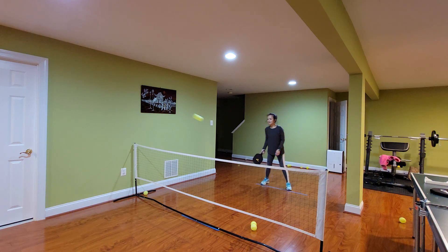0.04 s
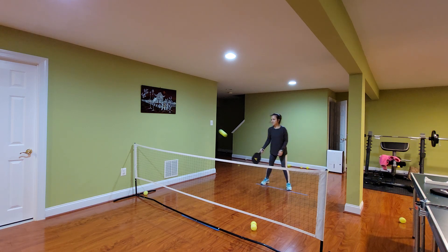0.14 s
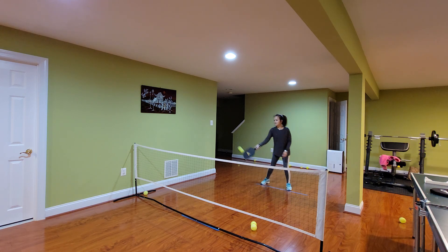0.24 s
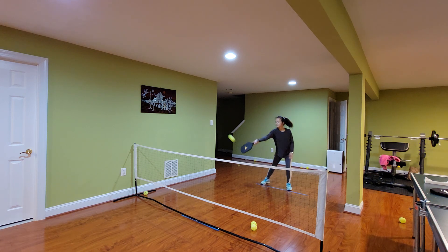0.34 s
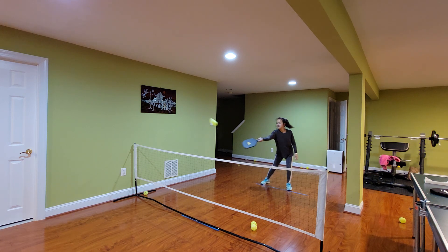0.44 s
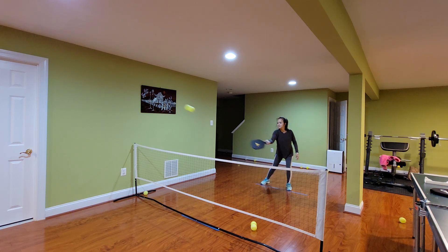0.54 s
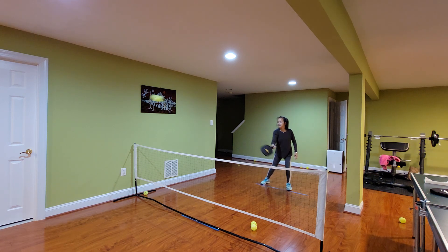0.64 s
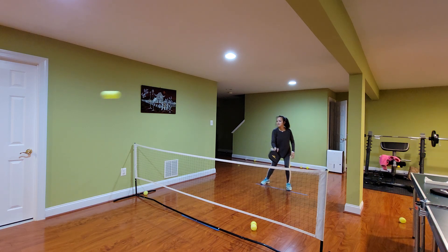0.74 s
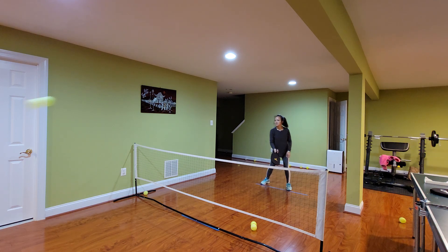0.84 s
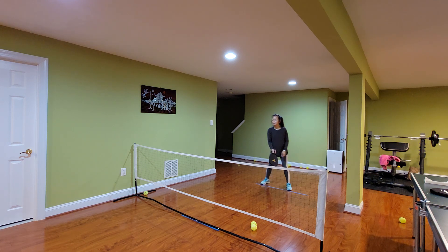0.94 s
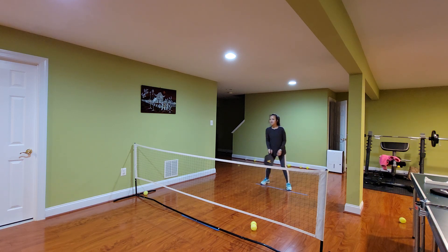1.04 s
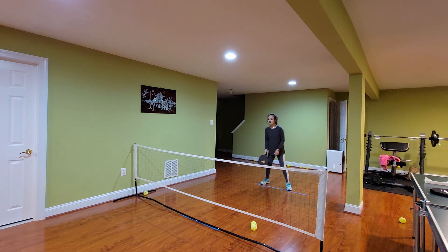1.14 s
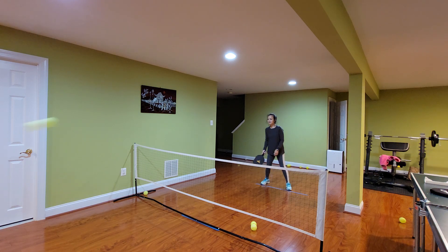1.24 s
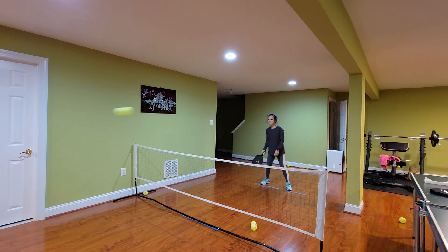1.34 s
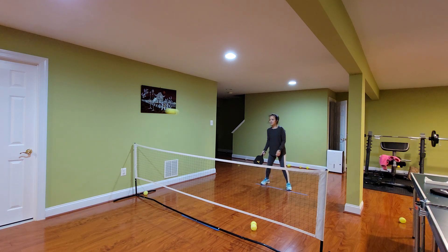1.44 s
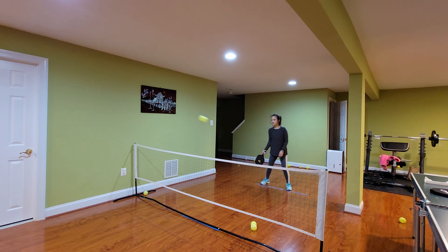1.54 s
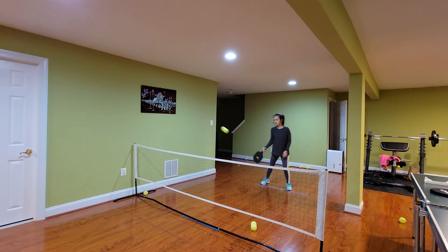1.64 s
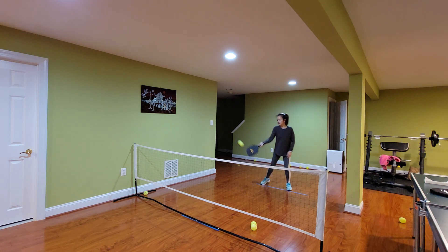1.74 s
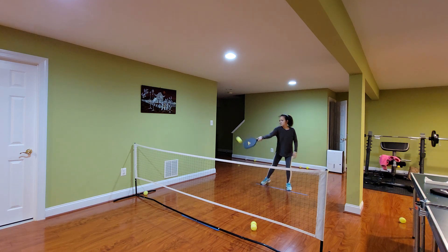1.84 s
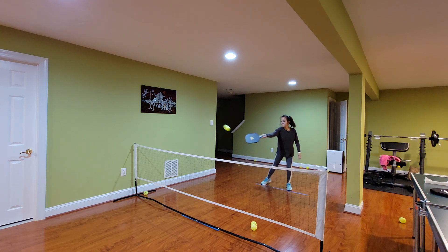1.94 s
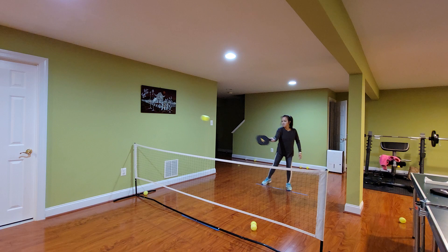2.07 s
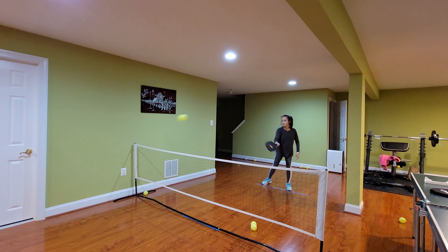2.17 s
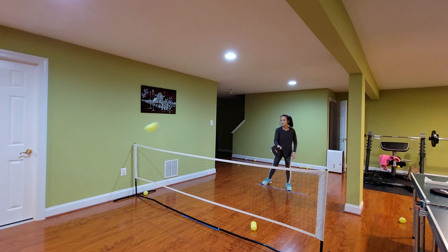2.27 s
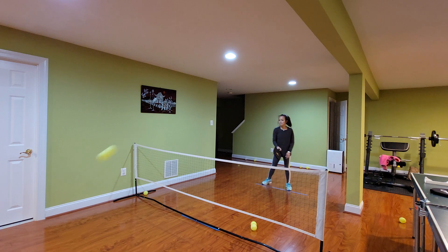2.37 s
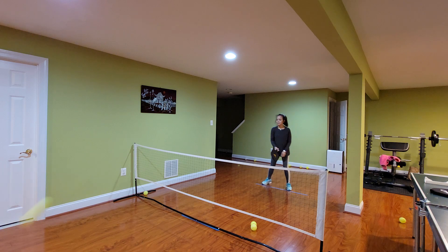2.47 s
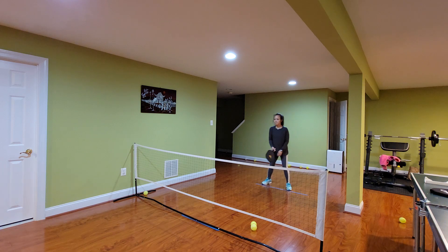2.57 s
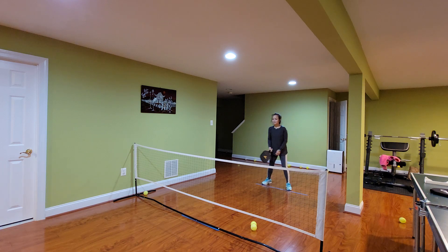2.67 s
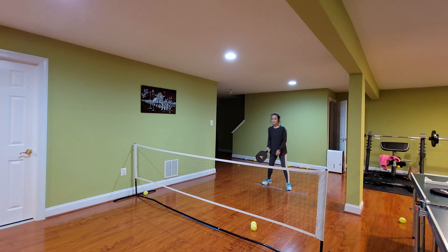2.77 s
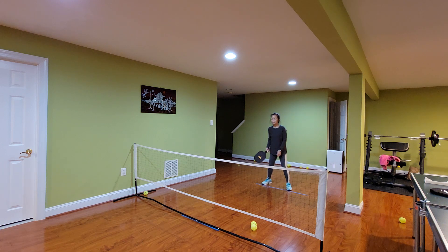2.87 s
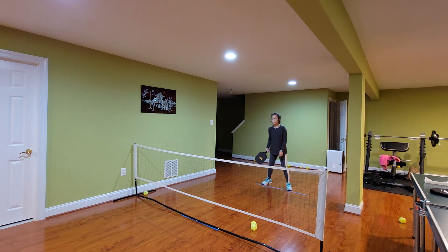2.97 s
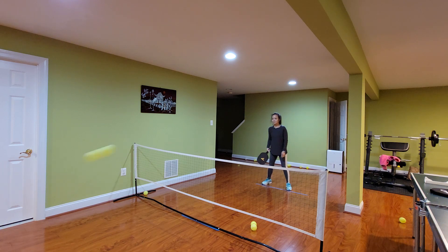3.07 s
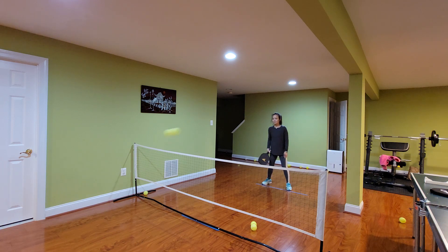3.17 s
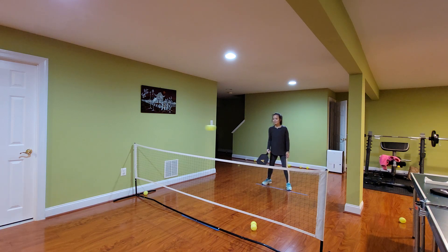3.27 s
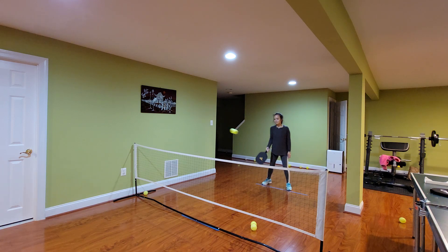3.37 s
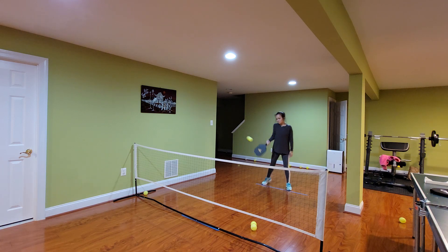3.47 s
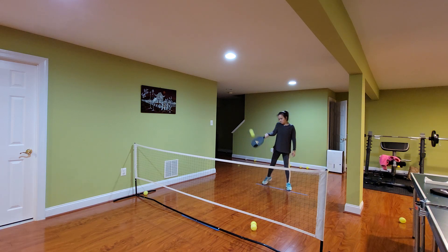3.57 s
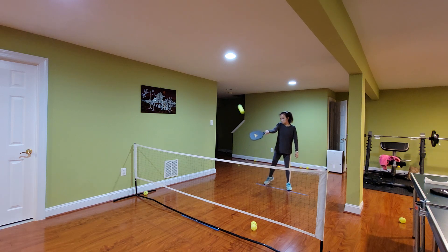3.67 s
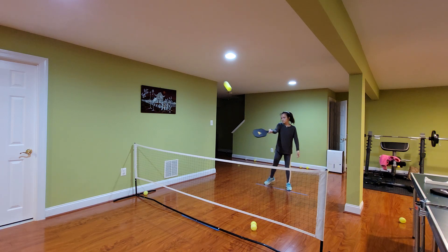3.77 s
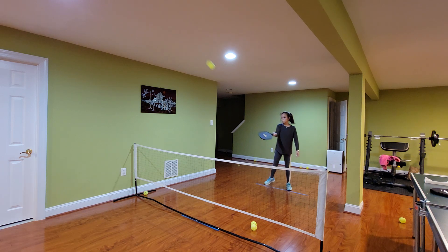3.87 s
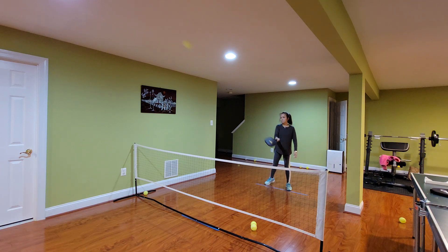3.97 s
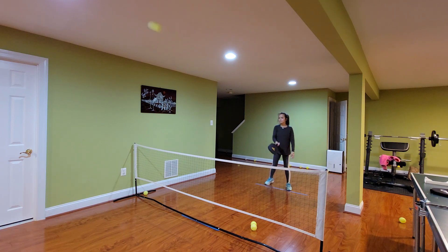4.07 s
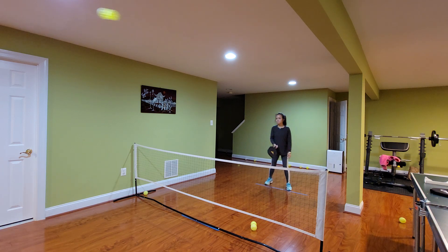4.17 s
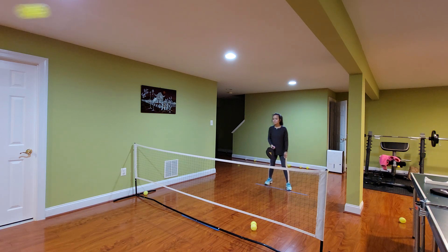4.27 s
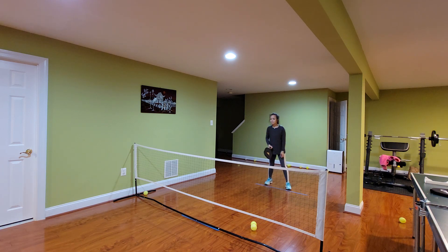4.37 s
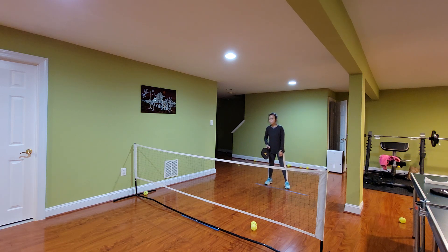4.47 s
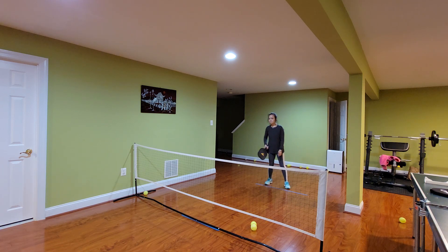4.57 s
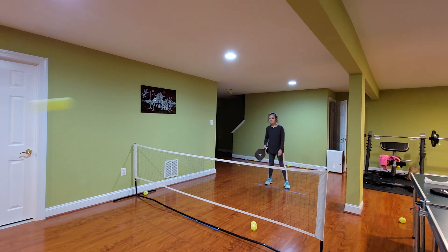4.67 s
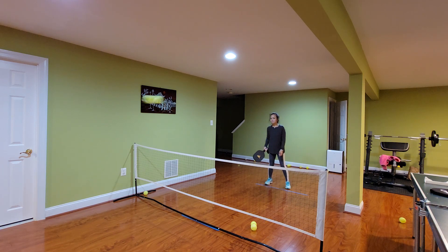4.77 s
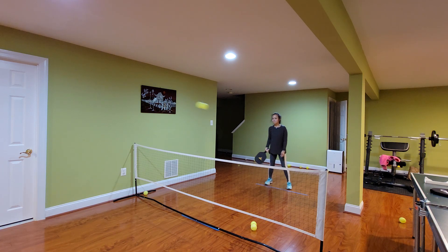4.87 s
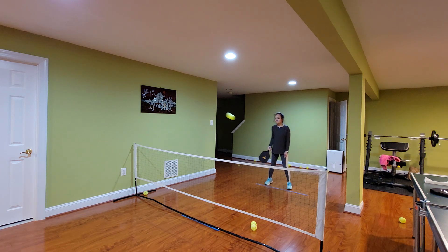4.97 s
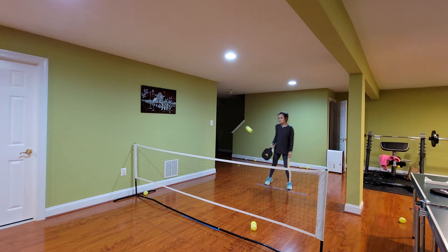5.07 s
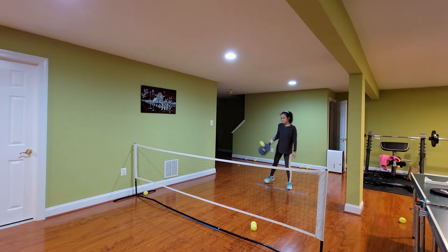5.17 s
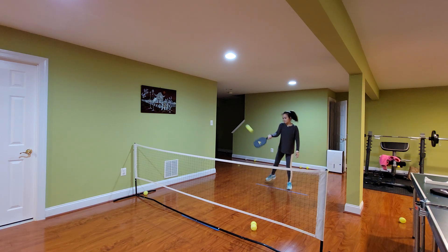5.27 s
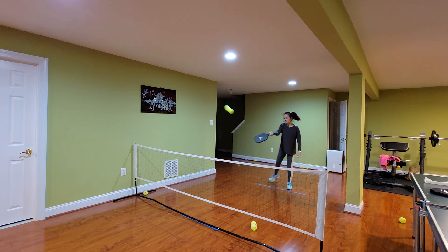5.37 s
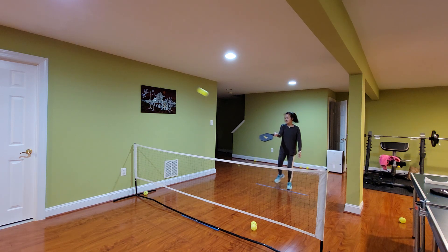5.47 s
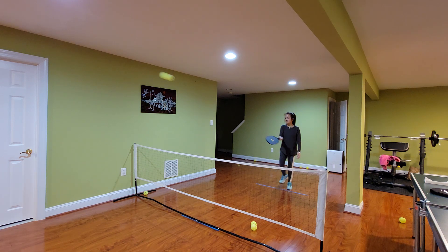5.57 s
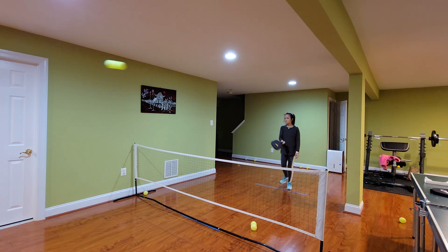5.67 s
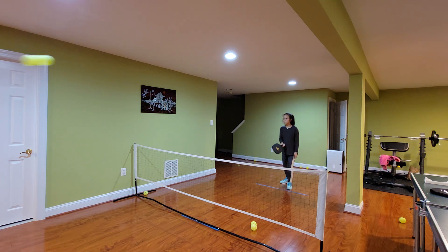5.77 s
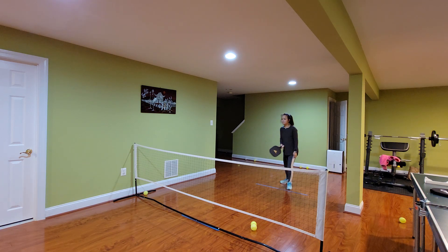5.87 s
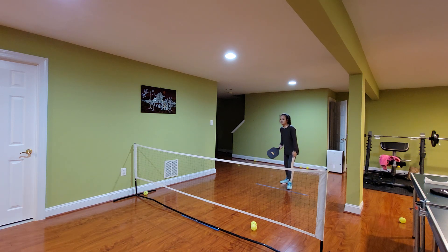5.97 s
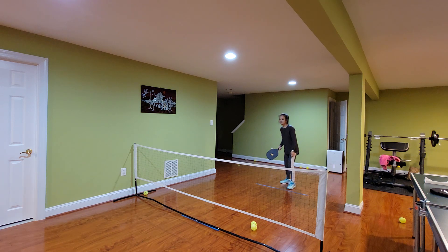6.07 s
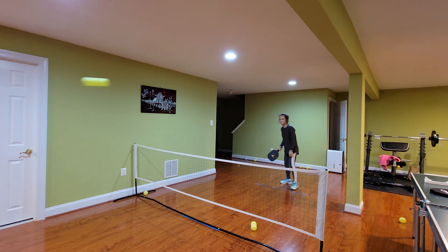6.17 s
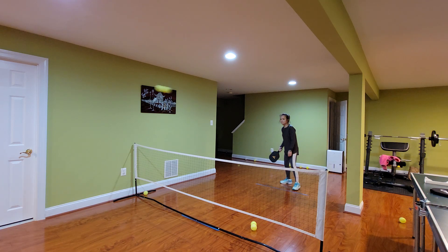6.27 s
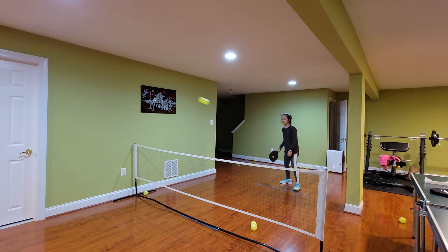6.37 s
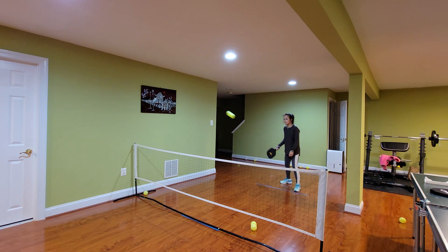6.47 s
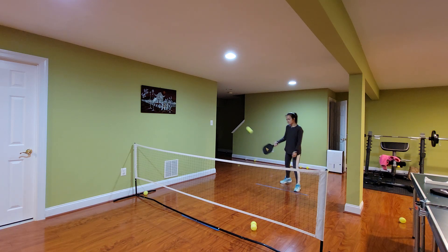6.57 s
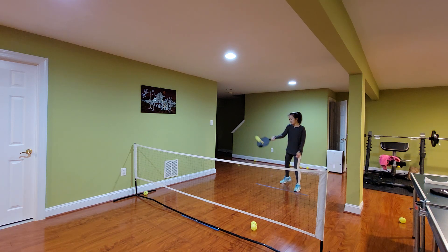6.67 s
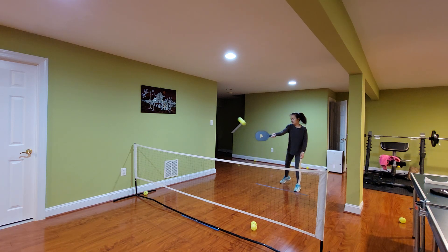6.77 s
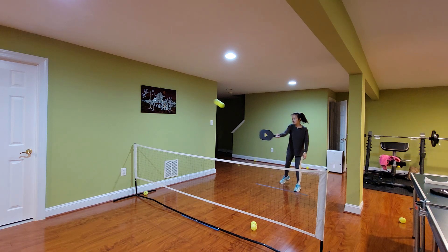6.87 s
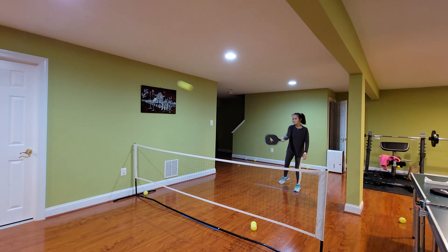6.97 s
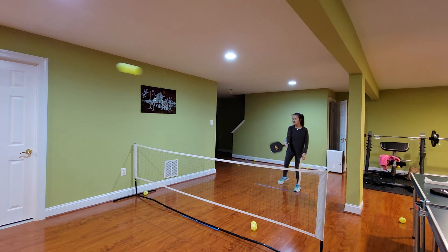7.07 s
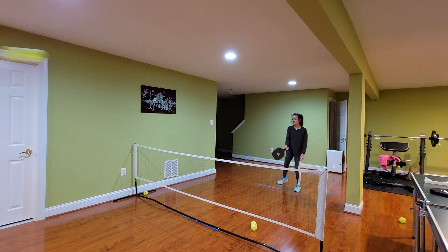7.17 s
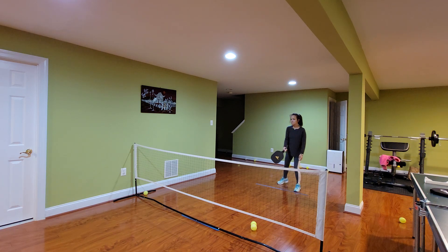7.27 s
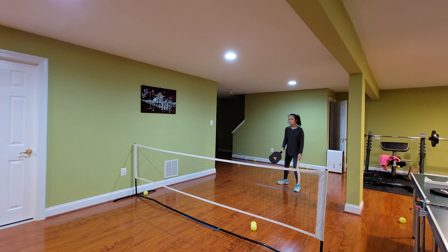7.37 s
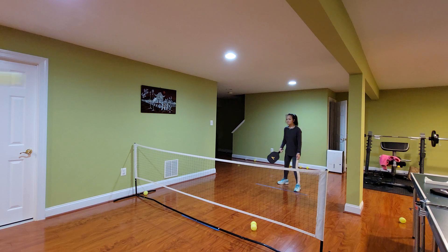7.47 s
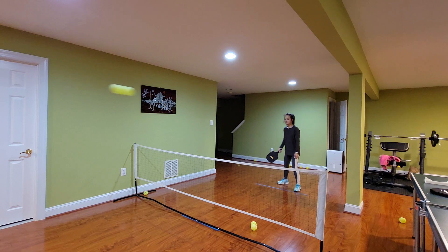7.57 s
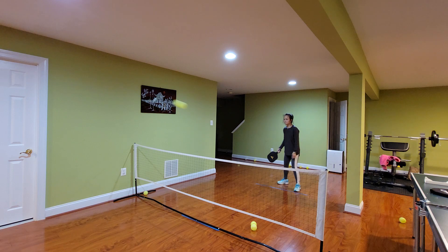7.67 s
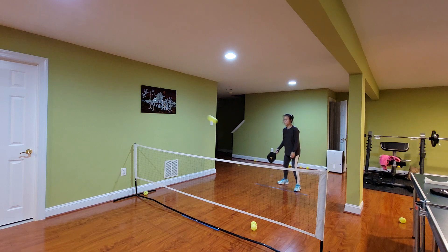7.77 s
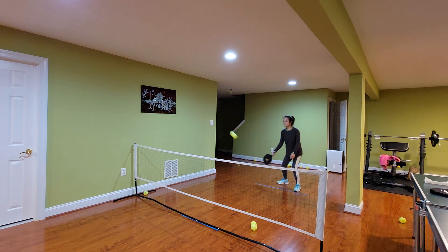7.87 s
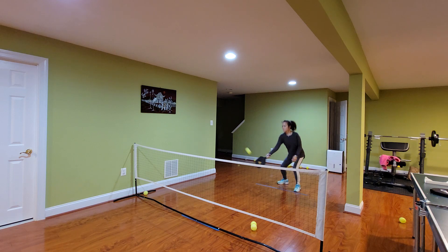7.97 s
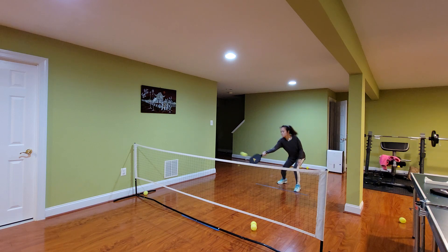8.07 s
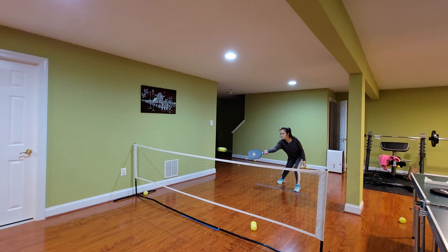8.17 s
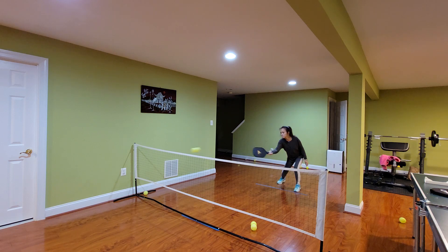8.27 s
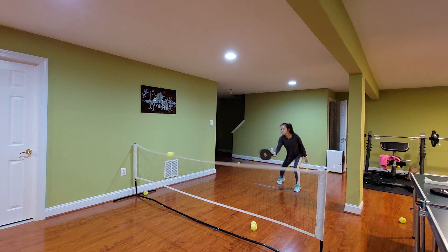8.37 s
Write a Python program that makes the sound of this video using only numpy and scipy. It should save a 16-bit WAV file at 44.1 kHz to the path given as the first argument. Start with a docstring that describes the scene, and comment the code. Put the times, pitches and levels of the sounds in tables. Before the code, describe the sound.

Two players volley a hollow plastic ball in a low, bare basement, heard through a stereo microphone. Each paddle hit is a loud, sharp knock with a bright click, followed by a room ring that fades in under a second. The farther player, ahead, hits first at about 0.4 seconds, the nearer one on the left answers at 1.2, and the far one hits again at 1.9. A soft scuff of shoes and clothes comes around 2.4 seconds, and the ball pops once on the wooden floor at 2.8, a little quieter than the hits. The near player returns it at 3.0. The knocks then keep alternating at similar loudness, at about 3.7, 4.7, 5.4, 6.1, 6.8, 7.5 and 8.2 seconds. Very faint brushing occurs near 4.7 and 6.6 seconds. A quiet, steady ventilation hum lies underneath throughout.

```python
"""Sharp paddle knocks ring in a low, bare basement: two players volley a hollow plastic ball,
one far ahead, one close on the left. Each blow is a contact click plus damped modes of paddle
and ball, then first echoes and a diffuse tail. The ball pops once on the wooden floor; shoes and
clothes brush; ventilation hums below. The blows push a spaced stereo microphone into its limiter."""
import sys
import numpy as np
from scipy import signal
from scipy.io import wavfile

SR = 44100
rng = np.random.default_rng(int(sys.argv[2]) if len(sys.argv) > 2 else 0)


def to_wav(s):
    """Save 16-bit WAV."""
    ch = np.atleast_2d(s).T  # columns
    pcm = np.round(np.clip(ch, -1, 1) * 32767)  # PCM
    wavfile.write(sys.argv[1], SR, pcm.astype(np.int16))


N = 371322

# paddle blows: t/s, near player?, level/dB, off-centre/0-1, overtone/Hz, boom/dB, click/dB, left-right/dB
BLOWS = [(-.24, True, 2, 0.23, 1800, 0, -1, 0), (0.4280, False, 1.5, 0.09, 1970, 0.5, -1, -0.5),
         (1.2314, True, 1, 0.16, 1815, -3, -3.5, 2), (1.9443, False, 0.5, 0.74, 1935, 2.5, 1, -4.5),
         (3.0289, True, -2, 0.27, 1710, -1.5, 1, -1), (3.6952, False, 2, 0.13, 1800, -3, -3.5, 0.5),
         (4.6860, True, 1, 0.05, 1946, -1.5, -0.5, -1), (5.3536, False, 1.5, 0.02, 1814, -7.5, -2, -0.5),
         (6.1335, True, 2, 0.14, 1890, -10, -1.5, -3), (6.8193, False, 2, .1, 1780, -1.5, 0.5, 2.5),
         (7.501, True, 2.5, 0.48, 1863, -4.5, -2.5, 4), (8.186, False, 2, 0.99, 1824, -3, -1, -0.5)]
# ball on the floor: t/s, level/dB, left lead/ms, left-right/dB
BOUNCES = [(2.8075, -6, .4, 3)]
# modes of paddle and ball: f/Hz, level/dB, T60/s
BOOM_MODES = [(88.3, -26.5, 0.086), (169.7, -22.5, 0.072)]
HANDLE_BODY_MODES = [(323.7, -9.5, 0.02)]
FACE_MODES = [(971.8, -16.5, 0.12), (1385, -6.5, 0.0049), (1008.6, -10, 0.054)]
BALL_SHELL_MODES = [(2660, -20.5, 0.018), (2930, -19.5, 0.0089), (3813, -20.5, 0.0095),
                    (4160, -20.5, 0.0084), (5140, -23.5, 0.0024)]
BALL_FLOOR_MODES = [(330, -1.5, 0.02), (536, 1.5, 0.026), (1220, -8, 0.0072), (624, -1.5, 0.029),
                    (3040, -2.5, 0.0025)]
# shoe and cloth scuffs: peak t/s, low level/dB, bright level/dB, rise/s, fall/s
SCUFFS = [(2.40, -67, -55, 0.045, 0.17), (2.434, -35, -54, 0.0036, 0.01), (2.441, -54, -46, .0015, 0.0039),
          (4.671, -68, -50.5, 0.011, 0.084), (6.62, -64, -61, 0.049, 0.11)]
# noise spectra: f/Hz, relative density/dB
SCUFF_LOW_SPECTRUM = [(60, -16), (200, -6), (500, -1), (900, -17), (2500, -43)]
SCUFF_BRIGHT_SPECTRUM = [(700, -38), (2000, 15.5), (4000, 8), (8000, -6), (15000, -10)]
VENT_SPECTRUM = [(15, -45), (25, -11), (94, -7.5), (190, -8.5), (263, -6.5), (354, -4.5), (607, -14.5),
                 (695, -3.5), (936, -8.5), (1610, -15.5), (2220, -26), (2690, -27), (3160, -31),
                 (6560, -50.5), (16000, -48)]
# faint wavering tones: f/Hz, width/Hz, rms level/dB
WHINES = [(7240, 25, -90), (692, 7.4, -57)]
# floor, ceiling and wall echoes: left t/ms, right t/ms, left gain, right gain
FAR_ECHOES = [(1.5, 1.5, 0.22, -0.097), (3.0, 12, -0.034, 0.1), (5.1, 12, 0.23, 0.35),
              (8.5, 3.1, 0.28, -0.041), (11.4, 14, -0.29, 0.62), (18, 25, 0.098, 0.11)]   # a paddle's back radiates in opposite sign
NEAR_ECHOES = [(2.9, 1.72, 0.37, 0.2), (3.8, 3.4, 0.67, 0.8), (6.2, 5.8, 0.37, 0.43),
               (8.5, 4.9, 0.23, 0.39), (14, 11, 0.33, 0.67)]
BOUNCE_ECHOES = [(1.7, 2.34, 0.83, 0.49), (5.2, 5.2, 0.49, 0.58), (9.6, 29, .3, 0.21),
                 (18.6, 31, 0.22, 0.15)]
# room decay: f/Hz, T60/s
ROOM_T60 = [(60, 0.21), (160, 0.46), (420, 0.72), (1100, 0.94), (2910, 0.79), (5000, 0.73), (7680, 0.54),
            (11000, 0.38), (15000, 0.3)]
# diffuse sound at the spaced microphone: f/Hz, left-right correlation
COHERENCE = [(60, 0.89), (150, 1), (380, 0.36), (950, -0.59), (2380, -0.075), (5980, 0.023),
             (15000, -0.013)]
# microphone port resonances: f/Hz, width/Hz, boost/dB
MIC_PORTS = [(6670, 2070, 7), (14300, 1260, 7)]
# player positions: left lead/ms, tail level/dB, paddle edge-on/0-1
FAR_PLAYER, NEAR_PLAYER = (0.13, -26, 0), (0.29, -24.5, 0.38)

FACE_CENTRE_DB, FACE_RIM_LOSS_DB = 3, 9
KNOCK_CENTRE_HZ, KNOCK_RIM_RISE_HZ, KNOCK_T60_S = 566, 99, 0.016
KNOCK_CENTRE_DB, KNOCK_RIM_GAIN_DB = -9.5, 6.5
OVERTONE_DB, OVERTONE_T60_S, SHELL_SCATTER_DB = -14, 0.018, 1.5
CLICK_DB, CLICK_HIGHPASS_HZ = -0.5, 4700
BOUNCE_CLICK_DB, BOUNCE_LOWPASS_HZ, BOUNCE_TAIL_DB = 2, 8000, -30.5
SIDE_LEAD_MS, SHADOW_HZ, FAR_LOWPASS_HZ, EDGE_ON_HZ = 0.2, 1800, 5400, 3200
TAIL_SAMPLES, EARLY_SAMPLES, PRE_SAMPLES, BUILD_UP_S = int(1.3 * SR), 2048, 8, 0.0037
BAND_EDGES_HZ = 25 * 2 ** np.arange(0, 9.6, 0.5)
VENT_RMS_DB = -47
MIC_HIGHPASS_HZ, CUTOFF_HZ = 50, 16100
CEILING_DB, RELEASE_DB_PER_S, ATTACK_S, LOOK_AHEAD_S = -0.5, 71, 0.00022, 0.0041


def paddles():
    """Ball on paddle. From centre to rim the face rings less; the knock grows and rises in pitch."""
    out = np.zeros((2, N))
    for at_s, near, db, off_centre, overtone_hz, boom_db, click_db, pan_db in BLOWS:
        body = struck(BOOM_MODES, boom_db) + struck(HANDLE_BODY_MODES)
        face = struck(FACE_MODES, FACE_CENTRE_DB - FACE_RIM_LOSS_DB * off_centre)
        knock_hz = KNOCK_CENTRE_HZ + KNOCK_RIM_RISE_HZ * off_centre
        knock = struck([(knock_hz, KNOCK_CENTRE_DB, KNOCK_T60_S)], KNOCK_RIM_GAIN_DB * off_centre)
        overtone = struck([(overtone_hz, OVERTONE_DB, OVERTONE_T60_S)])
        tick = click(CLICK_DB + click_db)
        # knock opposes face: a spectral dip between them
        blow = tick + knock + overtone - face - body - ball_shell()
        echoes, position = (NEAR_ECHOES, NEAR_PLAYER) if near else (FAR_ECHOES, FAR_PLAYER)
        lead_ms, tail_db, edge_on = position
        place(out, at_s, amp(db) * blow, room(echoes, tail_db, lead_ms, pan_db, edge_on))
    return out


def ball_shell():
    """Shell ring. The holed ball lands turned another way each time, so mode levels scatter."""
    scatter_db = SHELL_SCATTER_DB * rng.standard_normal((len(BALL_SHELL_MODES), 1))
    return struck(BALL_SHELL_MODES + scatter_db * [0, 1, 0])


def click(db, pole_radius=0.7):
    """First contact of the hard shell: a bright impulse, smeared in time by all-passes."""
    tick = -amp(db) * signal.unit_impulse(4096)
    for hz in rng.uniform(7900, 14700, size=3):
        poles = [1, -2 * pole_radius * np.cos(2 * np.pi * hz / SR), pole_radius ** 2]
        tick = signal.lfilter(poles[::-1], poles, tick)
    return butterworth(tick, 1, CLICK_HIGHPASS_HZ, "high")


def struck(modes, db=0):
    """Damped modes after one blow; rows alternate in sign."""
    t = np.arange(4096) / SR
    return sum((-1) ** k * amp(db + mode_db - 60 * t / t60_s) * np.sin(2 * np.pi * hz * t)
               for k, (hz, mode_db, t60_s) in enumerate(modes))


def bounces():
    """The hollow ball pops on the boards; their softer contact dulls the click."""
    out = np.zeros((2, N))
    for at_s, db, lead_ms, pan_db in BOUNCES:
        tick = butterworth(click(db + BOUNCE_CLICK_DB), 1, BOUNCE_LOWPASS_HZ)
        pop = tick - struck(BALL_FLOOR_MODES, db)
        place(out, at_s, pop, room(BOUNCE_ECHOES, BOUNCE_TAIL_DB, lead_ms, pan_db))
    return out


def scuffs():
    """Shoes and clothes brush: low and bright noise, exponential rise and fall."""
    t = np.arange(N) / SR
    low, bright = diffuse_noise(SCUFF_LOW_SPECTRUM), diffuse_noise(SCUFF_BRIGHT_SPECTRUM)
    out = np.zeros((2, N))
    for peak_s, low_db, bright_db, rise_s, fall_s in SCUFFS:
        envelope = np.exp(np.where(t < peak_s, (t - peak_s) / rise_s, (peak_s - t) / fall_s))
        out += envelope * (amp(low_db) * low + amp(bright_db) * bright)
    return out


def room(echoes, tail_db, lead_ms, pan_db, edge_on=0):
    """Stereo response: direct sound, first echoes, a tail dying faster in bass and treble."""
    t = np.arange(TAIL_SAMPLES) / SR
    tail = sum(band * amp(-60 * t / at_hz(ROOM_T60, hz)) for hz, band in diffuse_bands(TAIL_SAMPLES))
    build_up = 1 - np.exp(-(t / BUILD_UP_S) ** 2)
    response = amp(tail_db) * build_up * tail
    lag_samples = np.arange(EARLY_SAMPLES) - PRE_SAMPLES - max(-lead_ms, 0) * SR / 1000
    early = np.sinc(lag_samples - np.array([[0], [lead_ms]]) * SR / 1000)
    early *= amp([[pan_db / 2], [-pan_db / 2]])
    if lead_ms > SIDE_LEAD_MS:   # source on the left: right port shadowed
        early[1] = butterworth(early[1], 2, SHADOW_HZ)
    else:   # the far paddle hides the contact
        early = butterworth(early, 1, FAR_LOWPASS_HZ)
    for left_ms, right_ms, left_gain, right_gain in echoes:
        delay_samples = np.array([[left_ms], [right_ms]]) * SR / 1000
        early += np.array([[left_gain], [right_gain]]) * np.sinc(lag_samples - delay_samples)
    # a paddle radiates few lows along its own plane
    response[:, :EARLY_SAMPLES] += early - edge_on * butterworth(early, 1, EDGE_ON_HZ)
    return response


def ventilation():
    """Steady air noise plus thin wavering tones."""
    out = amp(VENT_RMS_DB) * diffuse_noise(VENT_SPECTRUM)
    for hz, width_hz, db in WHINES:
        tone = butterworth(rng.standard_normal((2, N)), 2, [hz - width_hz / 2, hz + width_hz / 2], "band")
        out += amp(db) * tone / tone.std()
    return out


def diffuse_noise(spectrum):
    """Shaped stereo noise, rms 1."""
    noise = sum(amp(at_hz(spectrum, hz)) * band for hz, band in diffuse_bands(N))
    return noise / np.sqrt(np.mean(noise ** 2))


def diffuse_bands(samples):
    """Half-octave stereo noise bands; microphone spacing sets their left-right correlation."""
    white = rng.standard_normal((2, 2, samples))   # adjacent bands get independent noise
    for k, (low_hz, high_hz) in enumerate(zip(BAND_EDGES_HZ, BAND_EDGES_HZ[1:])):
        mid, side = butterworth(white[k % 2], 2, [low_hz, high_hz], "band")
        hz = np.sqrt(low_hz * high_hz)
        coherence = at_hz(COHERENCE, hz)
        yield hz, np.sqrt((1 + coherence) / 2) * mid + np.sqrt((1 - coherence) / 2) * side * [[1], [-1]]


def place(out, at_s, sound, response):
    """Mix a sound in at its time, through a room response."""
    start = round(at_s * SR) - PRE_SAMPLES
    heard = signal.fftconvolve(sound[None], response, axes=1)[:, max(-start, 0):N - start]
    start = max(start, 0)
    out[:, start:start + heard.shape[1]] += heard


def amp(db):
    """dB to gain."""
    return 10 ** (np.asarray(db) / 20)


def at_hz(points, hz):
    """Table value on a log-frequency axis."""
    points_hz, values = np.array(points).T
    return np.interp(np.log(hz), np.log(points_hz), values)


def butterworth(sound, order, hz, kind="low"):
    """Causal filter, low-pass by default."""
    return signal.sosfilt(signal.butter(order, hz, kind, fs=SR, output="sos"), sound)


def microphone(dry):
    """The capsule drops deep bass; its ports lift two treble bands."""
    heard = butterworth(dry, 3, MIC_HIGHPASS_HZ, "high")
    for hz, width_hz, db in MIC_PORTS:
        heard += (amp(db) - 1) * signal.lfilter(*signal.iirpeak(hz, hz / width_hz, fs=SR), heard)
    return heard


def limiter(sound):
    """Ducks both channels just ahead of peaks; release is linear in dB."""
    peak_db = 20 * np.log10(np.abs(sound).max(axis=0) + 1e-9)
    over_db = np.maximum(peak_db - CEILING_DB, 0)
    release_db = RELEASE_DB_PER_S * np.arange(N) / SR
    held_db = np.maximum.accumulate(over_db + release_db) - release_db
    ahead_samples = round(LOOK_AHEAD_S * SR)
    ahead_db = np.pad(held_db[ahead_samples:], (0, ahead_samples), "edge")
    pole = np.exp(-1 / (ATTACK_S * SR))
    return sound * amp(-signal.lfilter([1 - pole], [1, -pole], ahead_db))


def scene():
    """Blows, bounce and scuffs over ventilation."""
    return paddles() + bounces() + scuffs() + ventilation()


def record(dry):
    """Microphone, limiter, soft clip, steep treble cut."""
    ducked = limiter(microphone(dry))
    rounded = ducked / (1 + ducked ** 6) ** (1 / 6)
    treble_cut = signal.cheby2(18, 40, CUTOFF_HZ, fs=SR, output="sos")
    return np.clip(signal.sosfilt(treble_cut, rounded), -1, 1)


dry = scene()
out = record(dry)
to_wav(out)
```